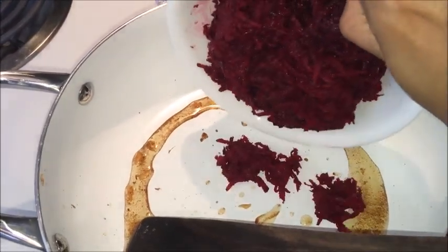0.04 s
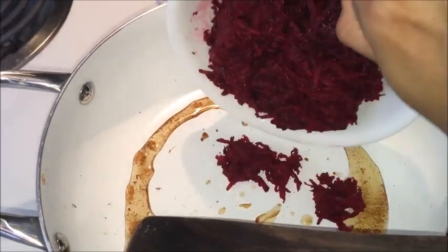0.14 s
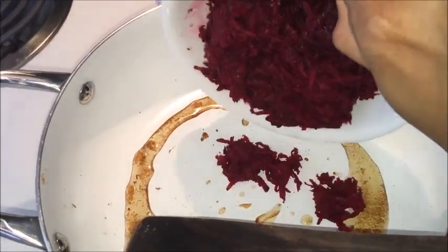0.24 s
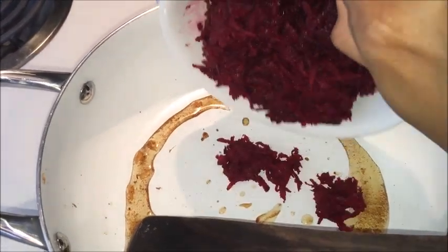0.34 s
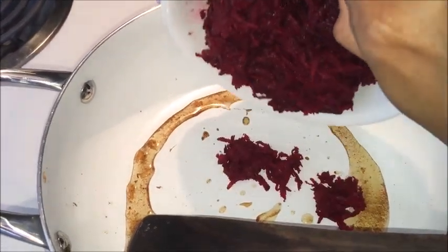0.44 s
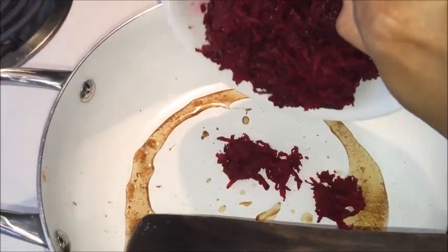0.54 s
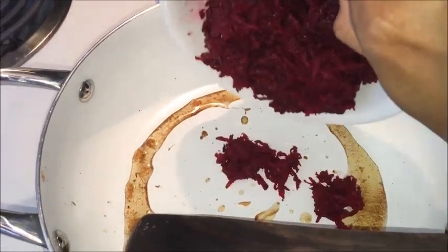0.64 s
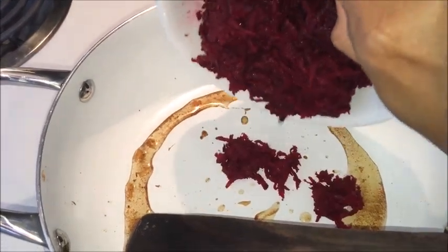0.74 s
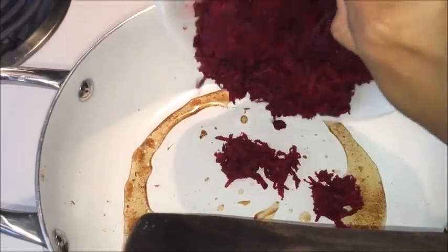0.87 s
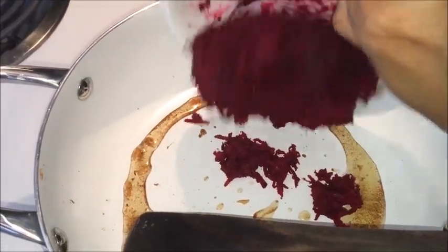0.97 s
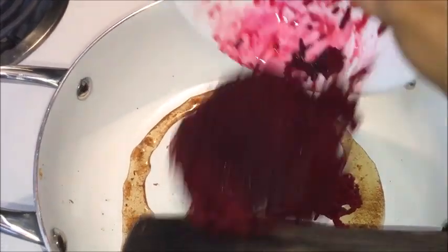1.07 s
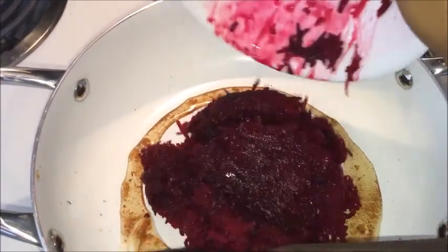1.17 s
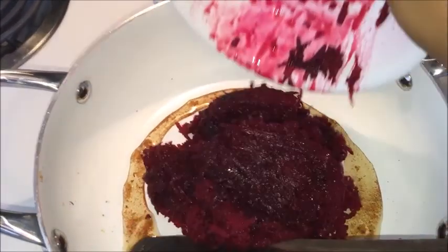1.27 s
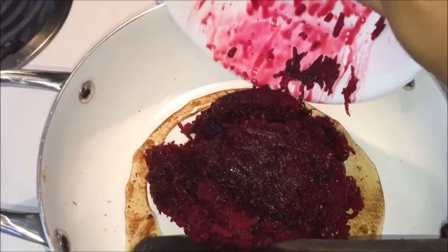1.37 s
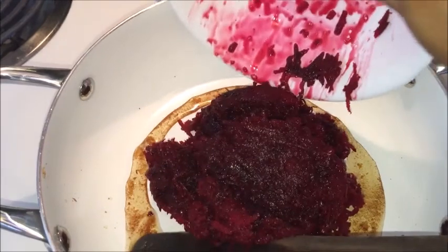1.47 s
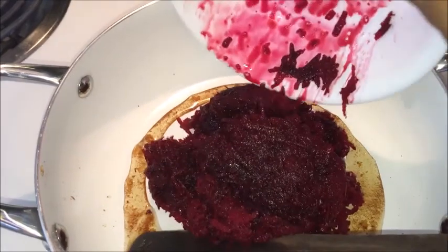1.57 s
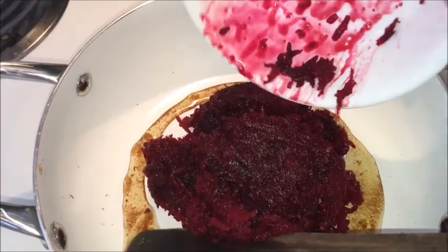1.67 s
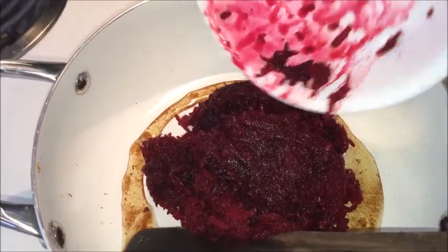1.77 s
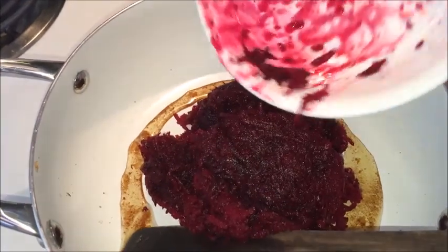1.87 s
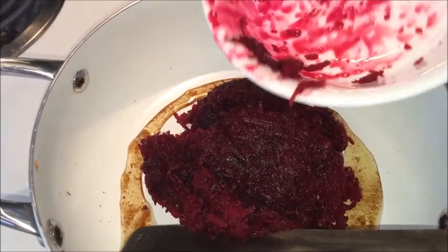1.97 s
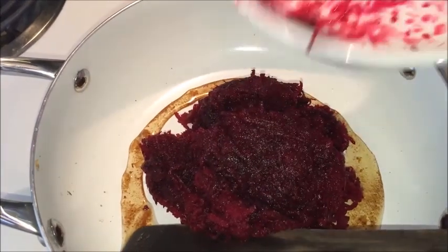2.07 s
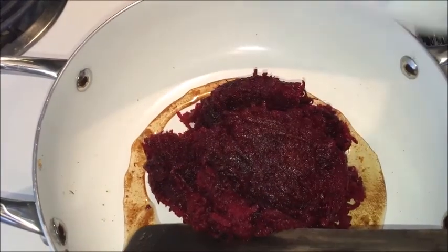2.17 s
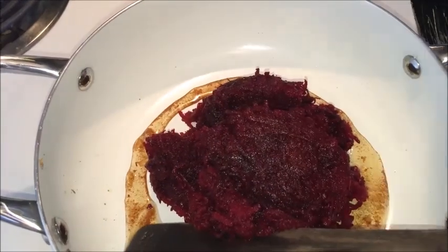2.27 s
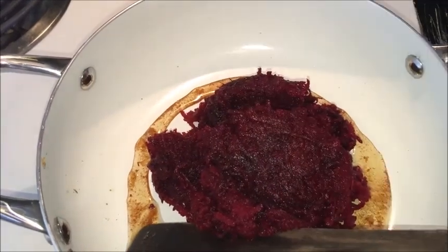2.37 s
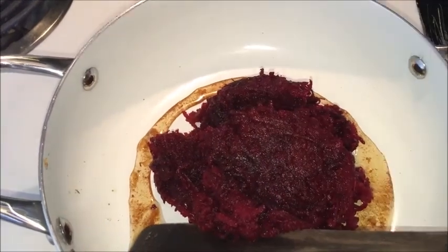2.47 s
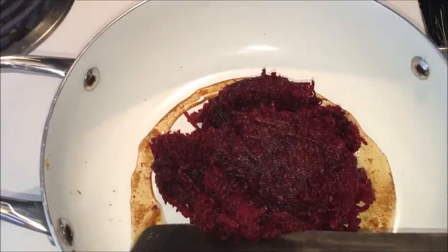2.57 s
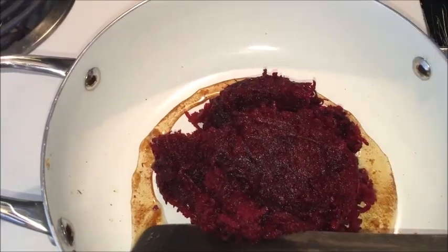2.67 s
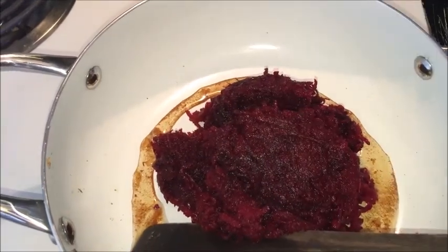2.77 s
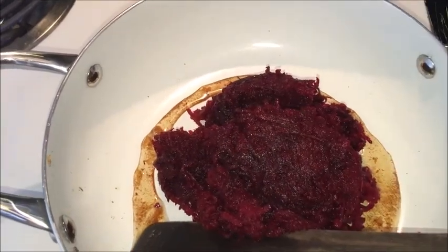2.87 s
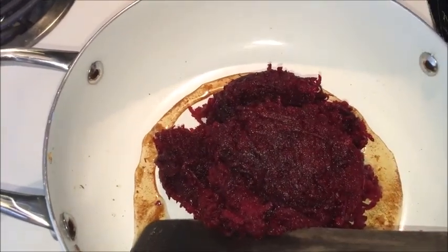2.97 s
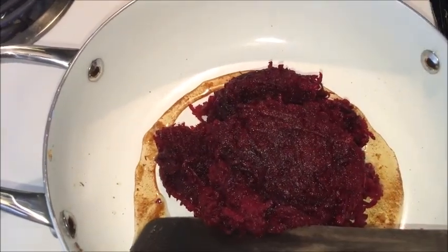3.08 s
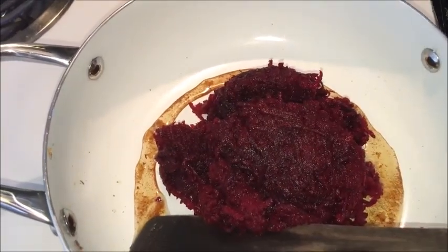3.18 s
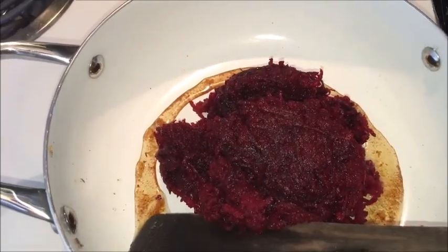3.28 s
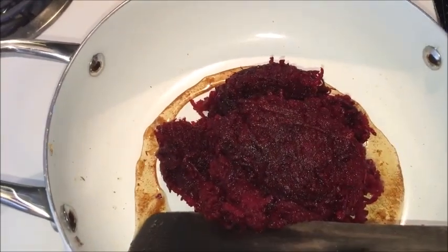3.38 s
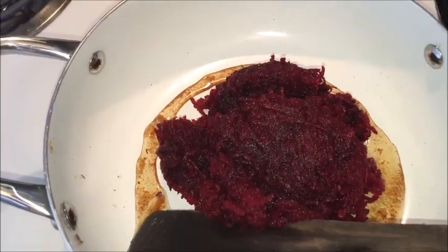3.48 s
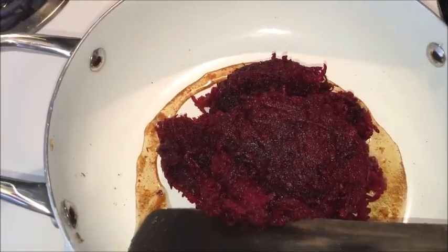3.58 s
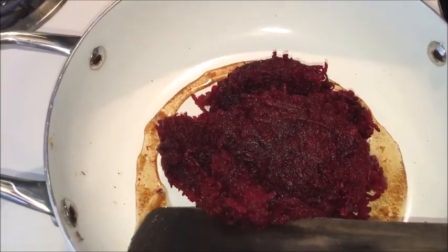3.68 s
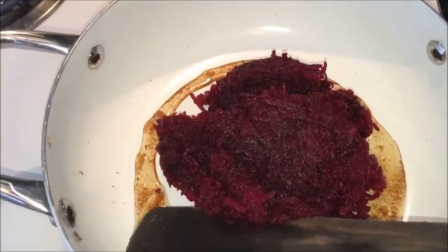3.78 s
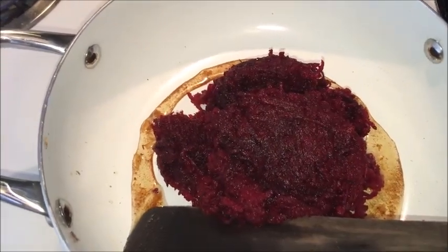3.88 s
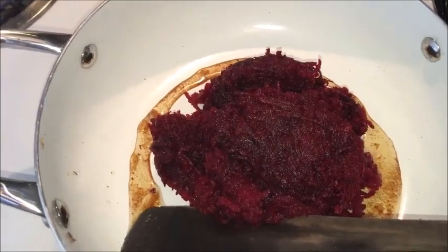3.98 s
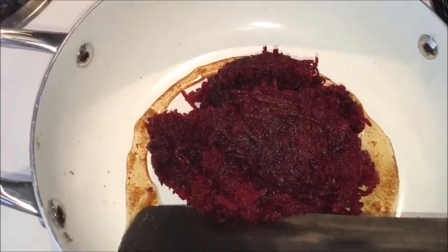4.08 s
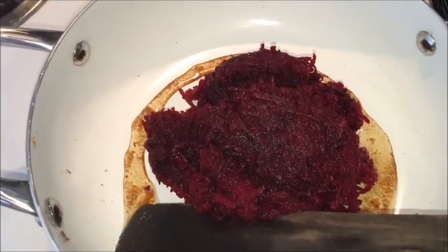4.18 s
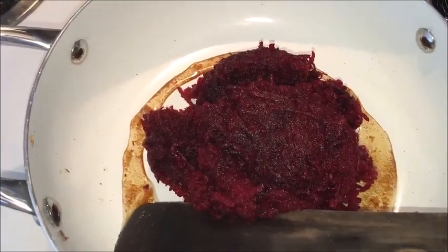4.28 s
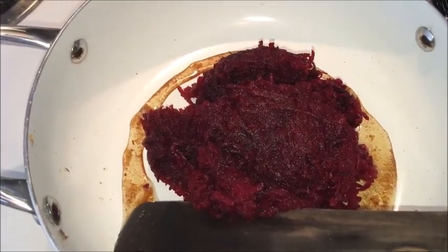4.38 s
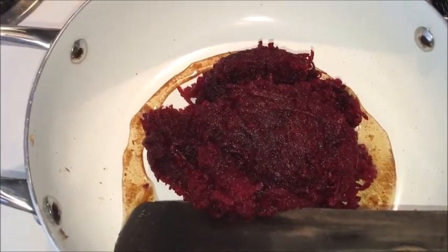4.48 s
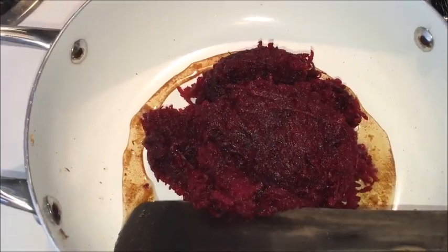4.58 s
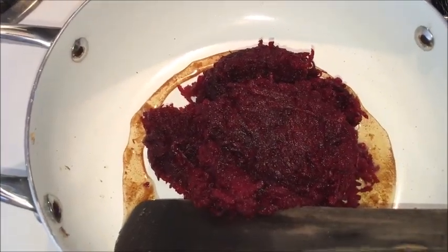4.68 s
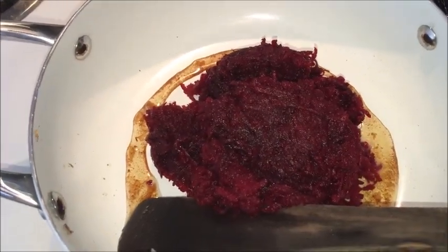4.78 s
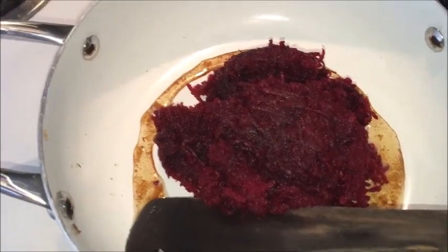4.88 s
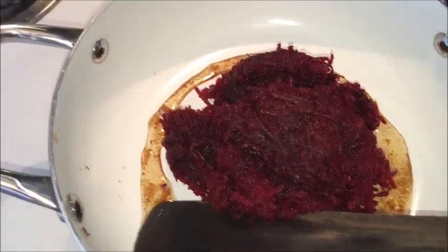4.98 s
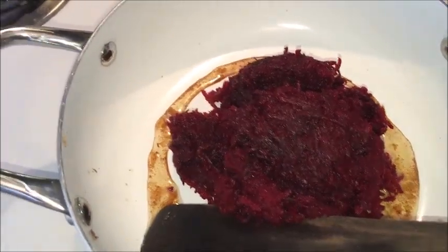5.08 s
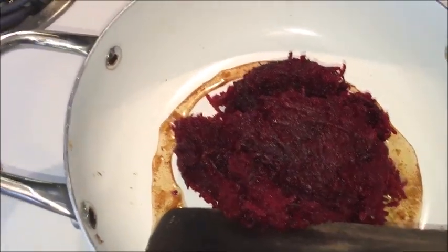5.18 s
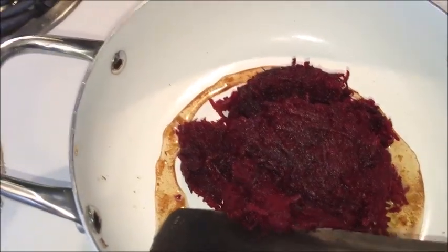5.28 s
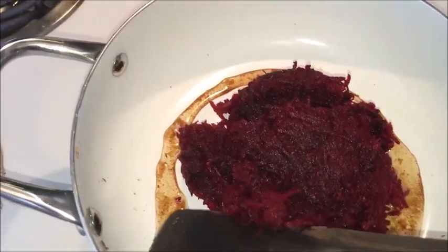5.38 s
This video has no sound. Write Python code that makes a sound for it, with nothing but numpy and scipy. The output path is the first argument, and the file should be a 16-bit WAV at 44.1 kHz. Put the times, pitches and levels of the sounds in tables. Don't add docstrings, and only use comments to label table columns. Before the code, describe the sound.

In a kitchen, close over a frying pan, first shreds of beetroot fizz thinly and brightly. After about a second the heap drops in with a quick cluster of wet thumps and slaps, and a dense sizzle bursts out, then slowly quietens. Fat spits now and then. A bowl is set on the worktop with a sharp double knock, and nudged softly near the end. Low fan hum underneath.

```python
import sys
import numpy as np
from scipy import signal
from scipy.fft import rfft, irfft, dct, next_fast_len
from scipy.io import wavfile
from scipy.ndimage import uniform_filter1d, minimum_filter1d

SR = 44100
rng = np.random.default_rng(int(sys.argv[2]) if len(sys.argv) > 2 else 0)


def wav_record(signal):
    frames = np.transpose(np.atleast_2d(signal))
    bounded = np.clip(frames, -1, 1)
    quanta = np.round(bounded * 32767).astype(np.int16)
    wavfile.write(sys.argv[1], SR, quanta)


def volts_from_db(level):
    exponent = np.asarray(level, float) / 20
    return 10 ** exponent


N = 240035
HEAP_LANDS_S = 1.19
FRAME = 2048


def rms_one(x):
    return x / np.sqrt(np.mean(x ** 2) + 1e-20)


def drift(rate_hz):
    pole = np.exp(-80 * np.pi * rate_hz / SR)
    noise = rng.standard_normal(N // 40 + 2002)
    slow = signal.lfilter([1], [1, -2 * pole, pole * pole], noise)[2000:]
    return np.interp(np.arange(N) / 40, np.arange(len(slow)), rms_one(slow - slow.mean()))


def ring(clicks, hz, t60_s):
    radius, turn = volts_from_db(-60 / (t60_s * SR)), 2 * np.pi * hz / SR
    return signal.lfilter([0, np.sin(turn)], [1, -2 * radius * np.cos(turn), radius ** 2], clicks + 1e-18)


def colour(x, points, notches=()):
    size = next_fast_len(N)
    hz = np.maximum(np.arange(size // 2 + 1) * SR / size, 1)
    point_hz, point_db = np.array(points).T
    db = np.interp(np.log(hz), np.log(point_hz), point_db)
    for centre_hz, width_hz, depth_db in notches:
        db = db + depth_db / (1 + ((hz - centre_hz) / width_hz) ** 2)
    return rms_one(irfft(rfft(x, size) * volts_from_db(db), size)[:N])


def slap(start_s, level_db, hz, swell_s):
    since = np.maximum(np.arange(N) / SR - start_s, 0)
    swell = since / swell_s * np.exp(1 - since / swell_s)
    return volts_from_db(level_db) * swell * np.sin(2 * np.pi * hz * since)


def dying_noise(starts, low_hz, high_hz, fade_s):
    t = np.arange(N) / SR
    envelope = sum(volts_from_db(db) * (t >= s) * np.exp(-np.maximum(t - s, 0) / fade_s) for s, db in starts)
    band = signal.butter(2, [low_hz, high_hz], "band", fs=SR, output="sos")
    noise = signal.sosfilt(band, envelope * rng.standard_normal(N))
    return noise * np.sqrt(SR / 2 / (high_hz - low_hz))


def struck(hits, modes, uneven_db):
    out = np.zeros(N)
    luck = rng.standard_normal((len(hits), len(modes)))
    signs = (-1) ** np.arange(len(modes))
    for (start_s, level_db, cut_hz), row in zip(hits, luck):
        at, click = round(start_s * SR), np.zeros(SR // 2)
        click[0] = volts_from_db(level_db)
        click = signal.sosfilt(signal.butter(2, cut_hz, fs=SR, output="sos"), click)
        sound = sum(sign * volts_from_db(db + uneven_db * d) * ring(click, hz, t60_s)
                    for (hz, db, t60_s), d, sign in zip(modes, row, signs))
        out[at:at + len(click)] += sound[:N - at]
    return out


def knocks(hits, modes, swell_s, low_hz, high_hz, fade_s):
    slaps = sum(slap(s, slap_db, hz, swell_s) for s, _, slap_db, hz in hits)
    rattle_starts = [(s + 0.003, body_db - 3) for s, body_db, _, _ in hits]
    rattle = dying_noise(rattle_starts, low_hz, high_hz, fade_s)
    crack_starts = [(s, body_db - 7) for s, body_db, _, _ in hits]
    crack = dying_noise(crack_starts, 2000, 2700, fade_s=0.00077)
    contacts = [(s, body_db, 1.6 * hz) for s, body_db, _, hz in hits]
    return slaps + struck(contacts, modes, uneven_db=3.0) + rattle + crack


# pitch_hz, level_db [rms]
HUM_TONES = [(45.7, -71), (61, -73), (88, -79.5), (163.5, -83), (170.7, -88.5), (182, -74.5), (299.3, -75),
             (360.7, -65.5), (351.6, -71), (374, -75)]
# pitch_hz, level_db [per Hz]
FAN_RUMBLE = [(20, -30), (40, 8), (70, -2), (140, -4.5), (190, -1.5), (300, -1), (400, -4), (520, -8),
              (900, -13.5), (1300, -63)]


def appliances():
    t = np.arange(N) / SR
    tones = np.zeros(N)
    for hz, level_db in HUM_TONES:
        level = volts_from_db(level_db + 1.7 * drift(1.6)) * np.sqrt(2)
        tones += level * np.sin(2 * np.pi * (hz * t + rng.random()))
    return tones + volts_from_db(-67.5) * colour(rng.standard_normal(N), FAN_RUMBLE)


def kitchen(x):
    t60_s, first_wall_s, wall_cut_hz = 0.26, 0.006, 1340
    t = np.arange(SR // 2) / SR
    echoes = rng.standard_normal(len(t)) * volts_from_db(-60 * t / t60_s) * (t > first_wall_s)
    echoes = signal.sosfilt(signal.butter(1, wall_cut_hz, fs=SR, output="sos"), echoes)
    return signal.fftconvolve(x, echoes / np.sqrt(np.sum(echoes ** 2)))[:N]


# start_s, end_s, pitch_hz, level_db
SHRED_SLIDES = [
    (.04, 0.082, 1280, -61),
    (1.044, 1.12, 1267, -63),
    (1.097, 1.172, 1260, -65),
]


def slides():
    t, rub = np.arange(N) / SR, rng.standard_normal(N)
    out = np.zeros(N)
    for start_s, end_s, hz, level_db in SHRED_SLIDES:
        swell = np.sin(np.pi * np.clip((t - start_s) / (end_s - start_s), 0, 1))
        out += volts_from_db(level_db) * swell * rms_one(ring(rub, hz, 0.09))
    return out


# start_s, body_db, slap_db, slap_hz
BOWL_KNOCKS = [
    (3.4003, -30.5, -15.5, 1284),
    (3.4915, -36.5, -24, 1170),
    (3.513, -43, -40, 700),
]
# pitch_hz, level_db, t60_s
WORKTOP_MODES = [(124, -17, 0.16), (236, -9, 0.096), (376, 0.5, 0.057), (534, -0.5, 0.056),
                 (690, 2.5, 0.048), (770, 5, 0.05), (793, 6, 0.037), (1095, 1.5, 0.05), (1160, -19, 0.038),
                 (2600, 5.5, 0.018)]


def bowl_put_down():
    return knocks(BOWL_KNOCKS, WORKTOP_MODES, swell_s=0.00105, low_hz=174, high_hz=1350, fade_s=0.02)


# start_s, body_db, slap_db, slap_hz
BOWL_NUDGES = [
    (5.294, -66, -41, 594),
    (5.2985, -43, -34.5, 1236),
    (5.299, -64, -39, 2480),
    (5.3133, -45.5, -39, 1620),
    (5.332, -50.5, -52, 2630),
]
# pitch_hz, level_db, t60_s
BOWL_MODES = [(332, -0.5, 0.14), (483, -13, 0.054), (813, -5, 0.1), (1248, -2, 0.11), (1600, -14, .04),
              (2374, -12, .03)]


def bowl_nudged():
    return knocks(BOWL_NUDGES, BOWL_MODES, swell_s=0.0022, low_hz=890, high_hz=2800, fade_s=0.012)


# start_s, slap_db, slap_hz, swell_s
LUMPS = [
    (1.192, -25.5, 1687, 0.0044),
    (1.197, -34, 1095, 0.0017),
    (1.208, -45, 1600, 0.0033),
    (1.2162, -21.5, 1450, .00094),
    (1.2185, -23, 2064, 0.0013),
    (1.229, -22.5, 1660, .0009),
    (1.237, -34.5, 1237, 0.0015),
    (1.247, -51.5, 1850, 0.003),
]
# pitch_hz, level_db, t60_s
PAN_MODES = [(125, -10, 0.32), (270, -4, 0.047), (346, 0.5, 0.06), (495, -6.5, 0.063), (565, -5, 0.035),
             (812, -2, .04)]


def landing():
    thumps = [(s, -34 - 197 * (s - HEAP_LANDS_S), 700) for s, _, _, _ in LUMPS]
    slaps = sum(slap(*lump) for lump in LUMPS)
    splashes = [(s, slap_db - 11) for s, slap_db, _, _ in LUMPS]
    return struck(thumps, PAN_MODES, uneven_db=2.0) + slaps + dying_noise(splashes, 1753, 7000, fade_s=0.002)


# start_s, peak_db, pitch_hz
FAT_SPITS = [(0.3621, -29, 7500), (.578, -27, 11500), (1.1375, -36, 12000), (1.3712, -21.5, 2940),
             (1.741, -30, 3000), (1.835, -28.5, 7500), (1.8941, -36, 12000), (3.3331, -20.5, 12000),
             (3.4501, -21.5, 12000), (3.4796, -23, 12000), (3.622, -23, 10000), (3.666, -22.5, 7950),
             (3.7396, -21.5, 9900), (3.7607, -26.5, 9900), (4.1164, -24, 12500), (4.3154, -21, 11100),
             (4.452, -29.5, 12000), (4.9281, -25, 12000), (5.3843, -20, 12500)]


def spits():
    out = np.zeros(N)
    for start_s, level_db, hz in FAT_SPITS:
        at, click = round(start_s * SR), np.zeros(SR // 20)
        click[0] = volts_from_db(level_db)
        out[at:at + len(click)] += ring(click, hz, 7.6 / hz)[:N - at]
    return out


def fizz(per_s, spread_db, cycles, low_hz, hiss_share, patchy_db, count=18):
    sizes = volts_from_db(spread_db * np.minimum(rng.exponential(1, N), 5)) * rng.choice([-1, 1], N)
    bursts = sizes * (rng.random(N) < per_s / SR)
    dealt = rng.integers(0, count, N)
    together = drift(33) + 1.3 * drift(27)
    bubbles = np.zeros(N)
    for k, hz in enumerate(np.geomspace(low_hz, 15000, count)):
        patch = volts_from_db(patchy_db * (together + drift(15)))
        bubbles += np.sqrt(hz) * patch * rms_one(ring(bursts * (dealt == k), hz, cycles / hz))
    steam = rng.standard_normal(N)
    return np.sqrt(1 - hiss_share) * rms_one(bubbles) + np.sqrt(hiss_share) * steam


# pitch_hz, level_db [per Hz]
SPRAY_SPECTRUM = [(290, -52), (500, -28.5), (1400, -11), (1500, -17), (1780, -11), (2440, -8), (2740, -10),
                  (4260, -13.5), (4580, -11.5), (7130, -4.5), (9090, -4), (15200, -5)]
# pitch_hz, width_hz, level_db
OPEN_PAN_PEAKS = [(1240, 250, -2), (1660, 450, -1.5), (2390, 47, 3.5), (3205, 82, 2.5), (4100, 110, -1.5),
                  (4500, 710, 4), (7560, 480, -5.5)]
# pitch_hz, level_db [per Hz]
HISS_SPECTRUM = [(1500, -58), (3000, -6.5), (4800, -8.5), (6500, -3), (8000, -5), (11500, -3.5),
                 (13500, -9), (15300, -10)]
# pitch_hz, level_db [per Hz]
BUBBLING_SPECTRUM = [(400, -23.5), (700, -12.5), (1100, -4), (1700, -0.5), (2500, -0.5), (3600, -3.5),
                     (4800, -4), (6500, -9.5), (9000, -18), (13000, -20.5)]
# pitch_hz, width_hz, level_db
WALL_NOTCHES = [(4900, 460, -7), (10680, 220, -5)]


def frying():
    t = np.arange(N) / SR
    since = np.maximum(t - HEAP_LANDS_S, 0)
    cooled_db = 12 * (1 - np.exp(-since / 2.91))

    def heap_gain(hot_db, rise_s, follows):
        return volts_from_db(hot_db - follows * cooled_db) * (1 - np.exp(-since / rise_s))

    spray_rise_s = 0.08
    shreds_gain = volts_from_db(-45.5 - 2 * t) * np.exp(-since / spray_rise_s)
    spray_gain = heap_gain(-44.5, spray_rise_s, 0.71) + shreds_gain
    hiss_gain = heap_gain(-39, 0.25, 1.075)
    bubbling_gain = heap_gain(-37.5, 0.0028, 1.117)

    spray = fizz(9800, spread_db=0.5, cycles=5.8, low_hz=940, hiss_share=0.5, patchy_db=0.5)
    hiss = fizz(12000, spread_db=3.5, cycles=3.6, low_hz=2364, hiss_share=0.53, patchy_db=0.66)
    bubbling = fizz(6000, spread_db=0.35, cycles=8.9, low_hz=529, hiss_share=0.5, patchy_db=0.58)
    return (spray_gain * colour(spray, SPRAY_SPECTRUM, OPEN_PAN_PEAKS + WALL_NOTCHES[1:])
            + hiss_gain * colour(hiss, HISS_SPECTRUM, WALL_NOTCHES)
            + bubbling_gain * colour(bubbling, BUBBLING_SPECTRUM, WALL_NOTCHES))


def scene():
    blows = bowl_put_down() + bowl_nudged() + landing()
    blows = signal.sosfilt(signal.butter(2, 110, "high", fs=SR, output="sos"), blows)
    mono = frying() + spits() + slides() + blows + volts_from_db(-13.5) * kitchen(blows) + appliances()
    return np.array([mono, mono])


def holes(x):
    step_db, finer_bass_db, rounding = 6.0, 11, 0.38
    window = np.sin(np.pi * (np.arange(FRAME) + 0.5) / FRAME)
    hz = np.arange(FRAME) * SR / (2 * FRAME)
    out = np.pad(x, FRAME)
    spans = np.arange(0, len(out) - FRAME, FRAME // 2)[:, None] + np.arange(FRAME)
    lines = dct(out[spans] * window, norm="ortho")
    power = lines ** 2
    groups = np.repeat(power.reshape(len(lines), -1, 16).mean(axis=2), 16, axis=1)
    steady = minimum_filter1d(np.mean(power[:, 200:800], axis=1), size=7)
    faint = (groups < volts_from_db(2 * -8.5) * steady[:, None]) & (hz > 9000)
    quietest_nearby = np.sqrt(minimum_filter1d(groups, size=5, axis=0))
    step = volts_from_db(step_db - finer_bass_db * (hz < 520)) * quietest_nearby + 1e-9
    kept = np.sign(lines) * np.floor(np.abs(lines) / step + rounding) * step * ~faint
    np.subtract.at(out, spans, window * dct(lines - kept, type=3, norm="ortho"))
    return out[FRAME:-FRAME]


TOP_CUT_HZ = 15350
# start_s [middle], lost_share [0-1], full_s [fully thinned]
THIN_MOMENTS = [(1.272, .83, .025), (1.325, .78, .006), (1.389, .75, .006), (1.752, .74, .006),
                (2.146, .86, .023), (2.39, .74, .006), (2.445, .88, .023), (3.521, .86, .006),
                (4.481, .76, .006), (4.631, .85, .006), (4.866, .87, .006), (5.056, .6, .006),
                (5.121, .75, .006), (5.227, .82, .006), (5.44, .7, .006)]


def thin_moments(x):
    out = np.pad(x, 2 * FRAME)
    ramp = np.sin(np.linspace(0, np.pi / 2, FRAME // 4))
    for (s, lost, full_s), luck in zip(THIN_MOMENTS, rng.standard_normal((len(THIN_MOMENTS), 40))):
        window = np.concatenate([ramp, np.ones(round(full_s * SR)), ramp[::-1]])
        at = round(s * SR) + 2 * FRAME - len(window) // 2
        span = slice(at, at + len(window))
        lines = dct(out[span] * window, norm="ortho")
        place = np.sqrt(np.arange(len(lines)) / len(lines))
        favour = volts_from_db(3.2 * luck[(place * len(luck)).astype(int)])
        near = uniform_filter1d(lines ** 2, size=3)
        around = uniform_filter1d(lines ** 2, size=161) + 1e-20
        height = favour * near / around ** 0.6
        weak = height < np.quantile(height[:len(lines) * 2 * TOP_CUT_HZ // SR], lost)
        removed = lines * np.where(weak, 1, 1 - volts_from_db(2.5))
        out[span] -= window * dct(removed, type=3, norm="ortho")
    return out[2 * FRAME:-2 * FRAME]


# start_s [middle], pitch_hz [centre]
SIDE_PUFFS = [(.21, 11060), (.326, 8250), (1.163, 7580), (1.163, 11030), (1.163, 14440), (1.464, 8900),
              (1.58, 5630), (1.603, 4860), (1.766, 10320), (1.928, 6910), (2.09, 6340), (2.09, 10330),
              (2.857, 5570), (2.857, 12000), (2.857, 13600), (2.903, 7560), (2.903, 10400), (3.228, 6900),
              (4.296, 5800), (4.296, 9650), (4.296, 11700)]


def side_puffs(mono):
    out, window = np.zeros(N), np.hanning(FRAME)
    hz = np.arange(FRAME // 2 + 1) * SR / FRAME
    for (s, centre_hz), noise in zip(SIDE_PUFFS, rng.standard_normal((len(SIDE_PUFFS), FRAME))):
        at = round(s * SR) - FRAME // 2
        band = np.abs(hz - centre_hz) < 1330 / 2
        level = np.std(irfft(rfft(mono[at:at + FRAME]) * band))
        out[at:at + FRAME] += volts_from_db(-2) * level * window * rms_one(irfft(rfft(noise) * band))
    return out


def band_limit(x):
    return signal.sosfilt(signal.butter(12, 16360, fs=SR, output="sos"), x)


def record(dry):
    top_cut = signal.ellip(14, 0.5, 70, TOP_CUT_HZ, fs=SR, output="sos")
    bass_cut = signal.butter(2, 38, "high", fs=SR, output="sos")
    mono = signal.sosfilt(bass_cut, signal.sosfilt(top_cut, dry[0]))
    thinned = thin_moments(holes(mono))
    side = side_puffs(mono)
    return band_limit(np.array([thinned + side, thinned - side]))


dry = scene()
out = record(dry)
wav_record(out)
```